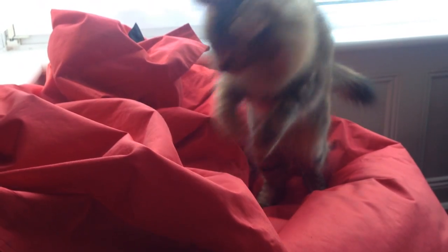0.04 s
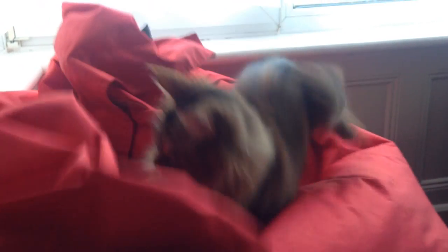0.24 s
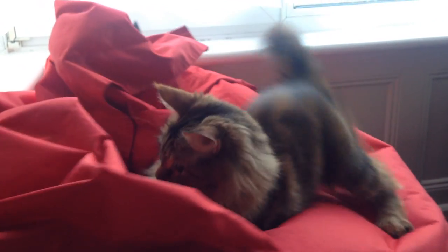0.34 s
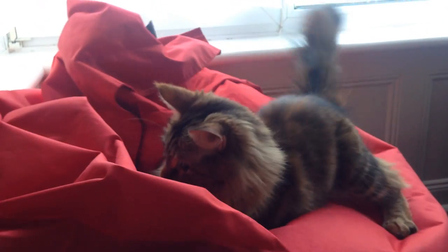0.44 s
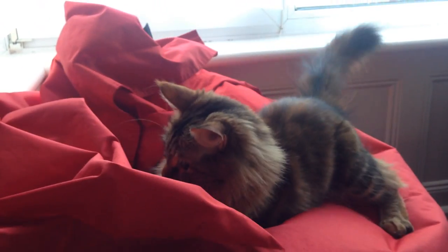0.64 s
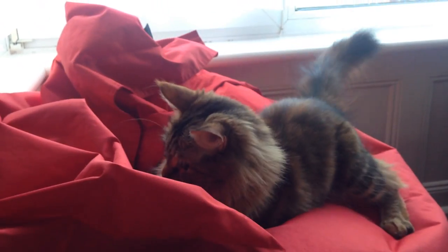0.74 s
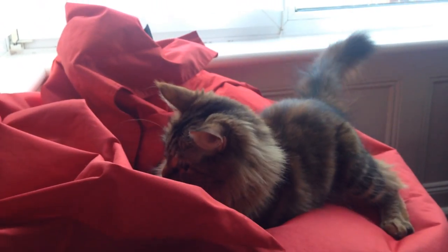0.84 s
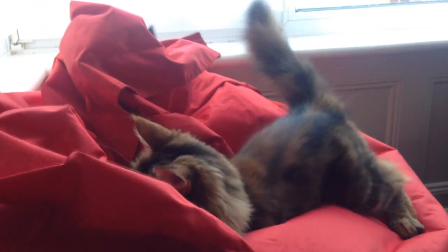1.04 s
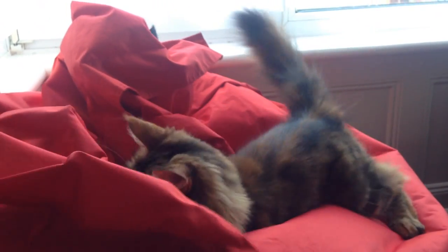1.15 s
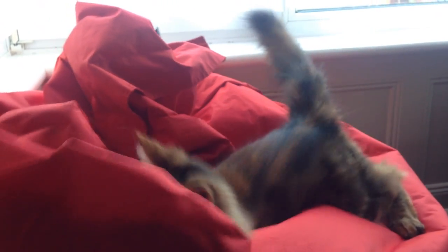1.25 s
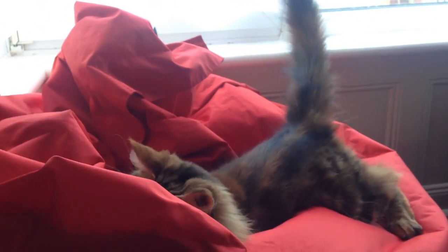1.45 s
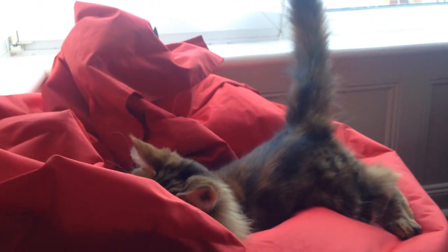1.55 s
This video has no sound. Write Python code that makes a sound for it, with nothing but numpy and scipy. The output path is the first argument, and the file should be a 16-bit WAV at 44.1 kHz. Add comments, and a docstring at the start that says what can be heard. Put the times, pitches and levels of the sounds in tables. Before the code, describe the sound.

A bean bag rustles and thumps as a cat pounces on it three times in a small room. One crunchy burst comes first, then a faint trickle of beads, then two more in quick succession with fabric snaps and tiny claw scratches.

```python
"""A faint paw thud and a trickle of beads, then a cat pounces three times on a bean bag in a small room.
Each paw is an impact that rings the damped modes of the filled bag. Each shove buckles the stiff cover
and shifts the beads in a rush of tiny clicks; folds snap taut, and claws zip over the periodic weave.
The beads trickle on faintly in between, and the quiet room adds a short diffuse echo."""
import sys
import numpy as np
from scipy import signal
from scipy.fft import rfft, irfft
from scipy.io import wavfile

SR = 44100
rng = np.random.default_rng(int(sys.argv[2]) if len(sys.argv) > 2 else 0)


def dump(signal):
    """Clip the signal to [-1, 1] and save it as 16-bit WAV at the path in sys.argv[1]."""
    limited = np.clip(np.atleast_2d(signal).T, -1, 1)
    pcm = np.round(limited * 32767).astype(np.int16)
    wavfile.write(sys.argv[1], SR, pcm)


N = 70560

# paws sinking into the filling: start_s, peak_db, contact_s
PAW_IMPACTS = [(.034, -53, 0.0025), (.204, -31.5, .001), (0.23, -27, 0.003), (.264, -24, 0.002),
               (.2735, -30, 0.0014), (.283, -19, 0.00091), (.310, -31, 0.0045), (.354, -26, 0.0018),
               (.374, -26.5, 0.00017), (0.3871, -25, 0.00088), (0.394, -24, .0015), (0.639, -55, 0.0068),
               (0.689, -49.5, 0.0082), (0.743, -52.5, 0.0027), (0.782, -59, 0.0028), (.959, -22.5, 0.00087),
               (0.976, -31, 0.00054), (1.036, -27, 0.00091), (1.055, -43, 0.0068), (1.2213, -23.5, 0.00074),
               (1.2432, -18, 0.0019), (1.3017, -24, 0.0015)]
# normal modes of the filled bag: pitch_hz, relative_db, t60_s
BAG_RESONANCES = [(59, -12, 0.053), (117, -15, 0.046), (181.4, -22.5, 0.21), (206.3, 0.5, 0.055),
                  (395, -3.5, 0.0274), (560, -1, 0.019), (660, -19, 0.0083), (804, -24, 0.023)]
# beads settling under the cat's weight: start_s, length_s, level_db
BEAD_TRICKLES = [(0.041, 0.21, -67), (0.443, .28, -55), (1.153, .08, -51.5), (1.413, .2, -58.5)]
# shoves of the cover: start_s, rise_s, hold_s, release_s, level_db, tilt_db_per_octave, fold_hz
COVER_SHOVES = [(0.177, 0.018, 0.008, 0.0013, -55.5, 1, 800), (0.2, 0.006, 0.015, 0.0098, -32.5, -.5, 1390),
                (0.21, 0.0064, 0.021, 0.0096, -28.5, 0.8, 1290),
                (0.232, 0.0094, 0.014, 0.028, -26, 1.4, 1370),
                (0.254, 0.011, 0.016, 0.024, -29, 0.96, 1110),
                (0.289, 0.0091, 0.048, 0.019, -36.5, 0.8, 400),
                (0.344, 0.0055, 0.0075, 0.014, -27, 1.05, 1470),
                (0.361, 0.013, 0.017, 0.014, -32.5, -0.9, 443),
                (0.398, 0.0053, 0.039, .015, -49.5, 1.5, 363), (0.937, 0.032, 0.0083, 0.0044, -39, 0, 442),
                (0.975, 0.0075, 0.01, 0.014, -31.5, 0, 1930),
                (0.997, 0.0057, 0.033, 0.032, -33.5, 1.05, 2400),
                (1.022, 0.0049, 0.027, 0.032, -34, 0.67, 2070),
                (1.213, 0.0086, 0.0045, 0.042, -35, -0.5, 1030),
                (1.236, 0.0064, 0.0036, 0.036, -34.5, 0.4, 700),
                (1.254, 0.037, 0.018, 0.02, -34, 1.5, 2880),
                (1.3, 0.0022, 0.006, 0.0065, -29.5, -1.5, 2490),
                (1.342, 0.0071, 0.019, 0.036, -48, 0, 1550)]
# folds snapping taut: start_s, peak_db, centre_hz, crack_relative_db
FOLD_SNAPS = [(0.218, -21, 1540, -32), (0.3525, -20.5, 1620, -20), (0.697, -48.5, 2720, -22),
              (.986, -18.5, 1760, -30), (1.0305, -14, 2230, -4.5), (1.0422, -32, 2100, -20),
              (1.219, -28, 870, -17), (1.2213, -18, 926, -9), (1.244, -21.5, 815, -24),
              (1.303, -38, 1280, -34)]
# claws crossing the weave: middle_s, length_s, level_db, threads_per_s
CLAW_STROKES = [(.997, 0.01, -37.5, 3550), (1.01, .014, -31.5, 2780), (1.044, 0.0067, -37, 3400),
                (1.2437, 0.0081, -25, 3100), (1.285, 0.016, -36, 2950), (1.303, 0.017, -29, 3250)]
# spectra of the beads, the cover, a fold's crack and the room's background: frequency_hz, density_db
BEAD_SPECTRUM = [(60, 3.5), (200, -4.5), (600, -8.5), (1200, -6), (2000, -7.5), (3200, -11), (6000, -21),
                 (15000, -49)]
COVER_SPECTRUM = [(20, -21), (40, 0), (62, -11), (120, -1.5), (210, -1.5), (300, 2.5), (550, 3), (800, 3),
                  (1050, -0.5), (1600, -.5), (2300, -.5), (3200, -5.5), (4500, -7), (6500, -18),
                  (10000, -27), (15500, -34)]
CRACK_SPECTRUM = [(100, -12), (1500, 0.5), (4400, 6), (6500, -15), (10000, -15.5), (15000, -16)]
BACKGROUND_SPECTRUM = [(20, -24), (45, 4), (95, -3.5), (135, -12.5), (190, -6), (260, -16.5), (450, -16),
                       (900, -21.5), (2000, -22.5), (4000, -23.5), (15000, -27.5)]
# reverberation time of the room: frequency_hz, t60_s
ROOM_DECAY = [(100, 0.39), (220, 0.19), (400, 0.38), (900, 0.41), (2000, 0.44), (4000, 0.28), (8000, 0.48),
              (15000, 0.54)]


def undb(db):
    """Amplitude ratio of a level in decibels."""
    return 10 ** (np.asarray(db) / 20)


def unit(x):
    """Normalisation to an rms of 1."""
    return x / np.sqrt(np.mean(x ** 2) + 1e-20)


def colour(x, spectrum, tilt_db=0):
    """Minimum-phase filtering to a spectrum, tilted by tilt_db per octave about 1.5 kHz."""
    octave = np.log2(np.maximum(np.fft.rfftfreq(2 * N, 1 / SR), 10))
    hz, db = np.array(spectrum).T
    slope_db = tilt_db * (octave - np.log2(1500))
    cepstrum = irfft(np.log(undb(np.interp(octave, np.log2(hz), db) + slope_db)))
    cepstrum[1:N] *= 2  # a one-sided cepstrum makes the filter causal
    cepstrum[N + 1:] = 0
    return irfft(rfft(x, 2 * N) * np.exp(rfft(cepstrum)))[:N]


def resonate(x, hz, width, stages=1):
    """Second-order resonance, repeated in series; width is one stage's bandwidth over its centre."""
    b, a = signal.iirpeak(min(hz, SR / 4), max(1 / width, np.e * hz / SR), fs=SR)
    for _ in range(stages):
        x = signal.lfilter(b, a, x)
    return x


def wander(per_s):
    """Random modulation: Gaussian values joined by straight lines, with a spread near 1."""
    return np.interp(np.arange(N) * per_s / SR, np.arange(N), rng.standard_normal(N))


def clicks(per_s, spread_db):
    """Shot noise: independent impulses, mostly weak, a few strong."""
    size = undb(spread_db * np.minimum(rng.exponential(size=N), 2 * np.e))
    return (rng.random(N) < per_s / SR) * size * np.sign(rng.standard_normal(N))


def add_at_peak(out, x, start_s, peak_db):
    """Superposition of one transient, scaled to its peak level."""
    i = int(start_s * SR)
    out[i:i + len(x)] += undb(peak_db) * x[:N - i] / np.abs(x).max()


def paw_thuds(t):
    """Modal response: a half-sine force rings the bag's damped modes; a longer contact is duller."""
    out = np.zeros(N)
    ring = sum(undb(db) * np.cos(2 * np.pi * hz * t) * np.exp(-np.log(1000) * t / t60_s)
               for hz, db, t60_s in BAG_RESONANCES)
    for start_s, peak_db, contact_s in PAW_IMPACTS:
        force = np.sin(np.pi * np.minimum(t[:SR // 20] / contact_s, 1))
        add_at_peak(out, signal.fftconvolve(ring, force), start_s, peak_db)
    return out


def bead_trickle(t, rise_s=0.053, fade_s=0.33, stop_s=0.1, flicker_db=2.4):
    """Granular settling: the filling shifts in faint, uneven ticks, then comes to rest."""
    flow = np.zeros(N)
    for start_s, length_s, level_db in BEAD_TRICKLES:
        age = np.maximum(t - start_s, 0)
        decay = np.exp(-age / fade_s - np.maximum(age - length_s, 0) / stop_s)
        flow += undb(level_db) * np.minimum(age / rise_s, 1) * decay
    flicker = undb(flicker_db * wander(per_s=68.36))
    ticks = colour(clicks(per_s=2500, spread_db=2), BEAD_SPECTRUM)
    return flow * flicker * unit(ticks)


def cover_crumple(t, flicker_db=0.84, fold_db=-4.5):
    """Buckling: each shove releases a rush of clicks, and the moving fold adds a broad resonance."""
    out = np.zeros(N)
    for start_s, rise_s, hold_s, release_s, level_db, tilt_db, fold_hz in COVER_SHOVES:
        swell = np.clip((t - start_s) / rise_s, 0, 1)
        decay = np.exp(-np.maximum(t - start_s - rise_s - hold_s, 0) / release_s)
        buckles = clicks(per_s=10000, spread_db=2) * undb(flicker_db * wander(per_s=240))
        crinkle = colour(buckles, COVER_SPECTRUM, tilt_db)
        fold = undb(fold_db) * resonate(crinkle, fold_hz, width=0.44)
        out += undb(level_db) * swell * decay * unit(crinkle + fold)
    return out


def fold_snaps(t, pop_decay_s=0.0011, crack_decay_s=0.00084):
    """Impulsive excitation: a fold pulled taut gives a brief broadband pop with a thin crack on top."""
    out, age = np.zeros(N), t[:SR // 20]
    for start_s, peak_db, centre_hz, crack_db in FOLD_SNAPS:
        pop_burst = rng.standard_normal(len(age)) * np.exp(-age / pop_decay_s)
        pop = resonate(pop_burst, centre_hz, width=1.3, stages=3)
        crack_burst = rng.standard_normal(N) * np.exp(-t / crack_decay_s)
        crack = colour(crack_burst, CRACK_SPECTRUM)[:len(age)]
        add_at_peak(out, unit(pop) + undb(crack_db) * unit(crack), start_s, peak_db)
    return out


def claw_zips(t, jitter=0.13, rasp_db=-4):
    """Periodic excitation: a claw's unsteady rate of crossing threads sets a pitch, ringed by rasp."""
    out = np.zeros(N)
    for middle_s, length_s, level_db, threads_per_s in CLAW_STROKES:
        pitch_hz = threads_per_s * (1 + jitter * wander(per_s=1500))
        tone = np.sin(2 * np.pi * np.cumsum(pitch_hz) / SR)
        rasp = resonate(rng.standard_normal(N), threads_per_s, width=0.42, stages=2)
        envelope = np.exp(-(2 * (t - middle_s) / length_s) ** 2)
        out += undb(level_db) * envelope * unit(tone + undb(rasp_db) * unit(rasp))
    return out


def room_echo(x, t, first_reflection_s=0.007):
    """Reverberation: a diffuse field decays exponentially, each frequency band at its own rate."""
    noise_spectrum, tail = rfft(rng.standard_normal(N)), np.zeros(N)
    octave = np.log2(np.maximum(np.fft.rfftfreq(N, 1 / SR), 1))
    hz, decay_times = np.array(ROOM_DECAY).T
    for share, t60_s in zip(np.eye(len(hz)), decay_times):
        band = irfft(noise_spectrum * np.interp(octave, np.log2(hz), share), N)
        tail += band * np.exp(-np.log(1000) * t / t60_s)
    tail *= t > first_reflection_s
    return signal.fftconvolve(x, unit(tail) / np.sqrt(N))[:N]


def scene(rustle_echo_db=-12, paw_echo_db=-9, background_db=-60.5):
    """Superposition of the direct sound, its echo and the room's steady background, in one channel."""
    t = np.arange(N) / SR
    rustle = cover_crumple(t) + fold_snaps(t) + claw_zips(t) + bead_trickle(t)
    paws = paw_thuds(t)
    echo = room_echo(undb(rustle_echo_db) * rustle + undb(paw_echo_db) * paws, t)
    background = undb(background_db) * unit(colour(rng.standard_normal(N), BACKGROUND_SPECTRUM))
    return (rustle + paws + echo + background)[None]


def record(dry, low_cut_hz=59, high_cut_hz=15350):
    """Band limiting: the microphone chain removes the deepest bass and the highest treble."""
    highpass = signal.butter(2, low_cut_hz, "high", fs=SR, output="sos")
    lowpass = signal.ellip(10, 0.2, 70, high_cut_hz, fs=SR, output="sos")
    return signal.sosfilt(lowpass, signal.sosfilt(highpass, dry))


dry = scene()
out = record(dry)
dump(out)
```